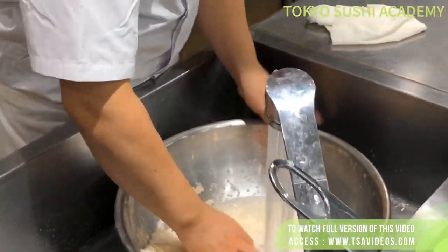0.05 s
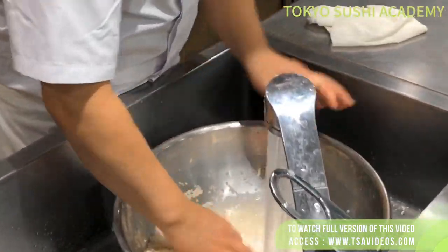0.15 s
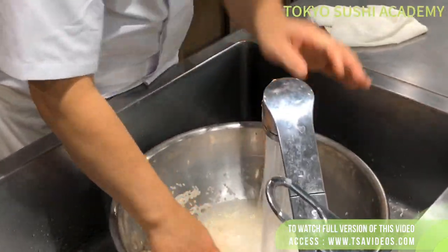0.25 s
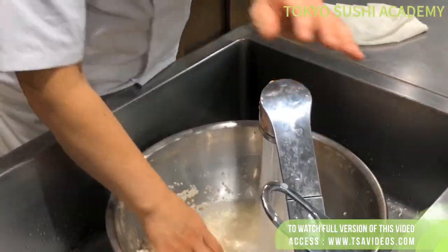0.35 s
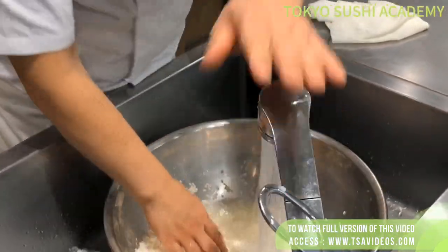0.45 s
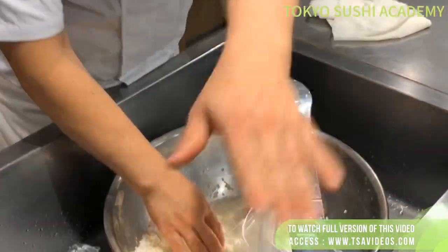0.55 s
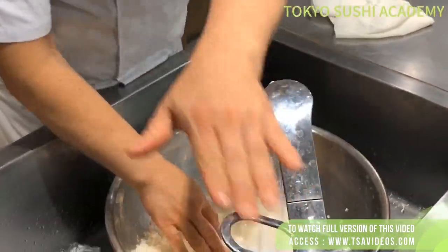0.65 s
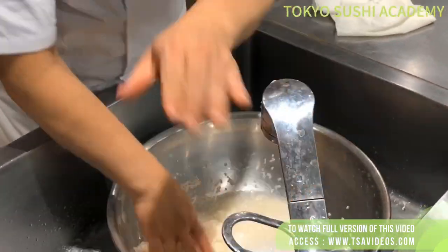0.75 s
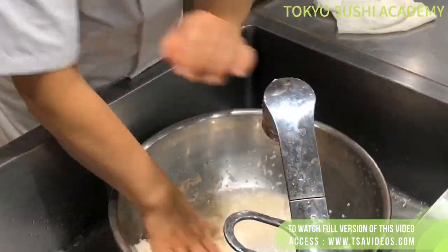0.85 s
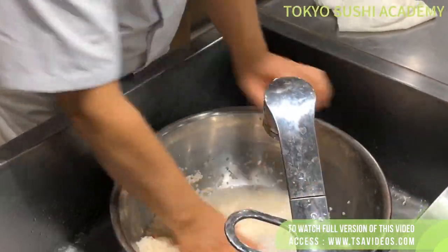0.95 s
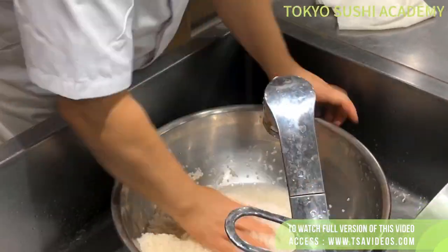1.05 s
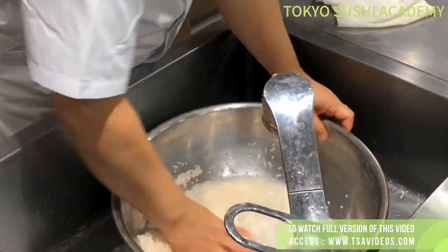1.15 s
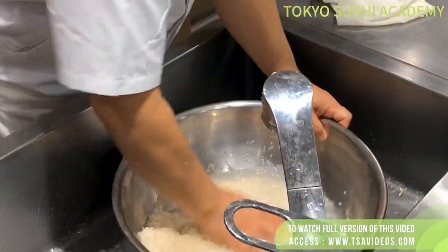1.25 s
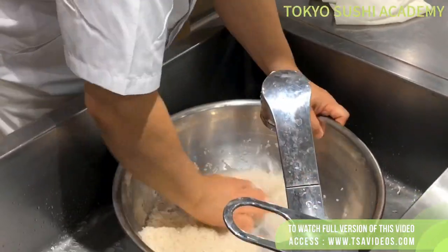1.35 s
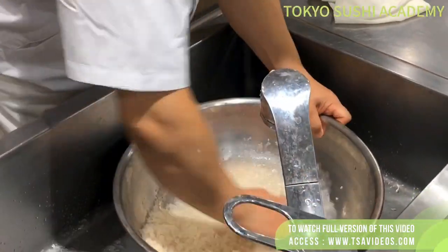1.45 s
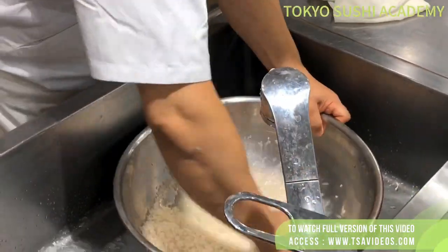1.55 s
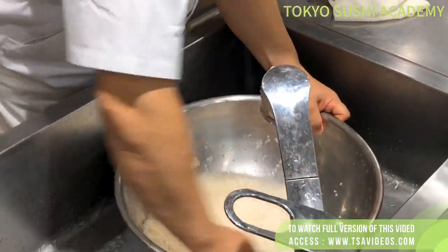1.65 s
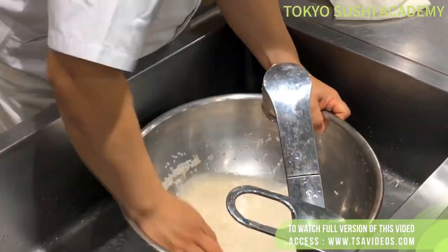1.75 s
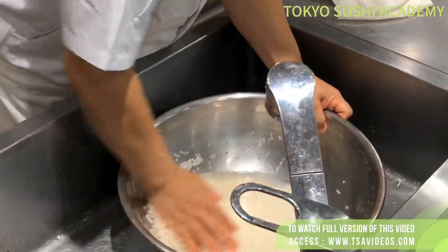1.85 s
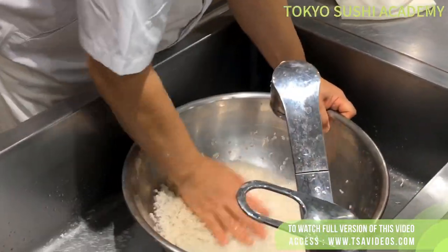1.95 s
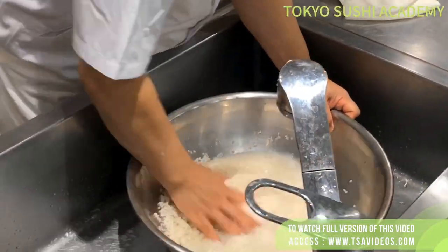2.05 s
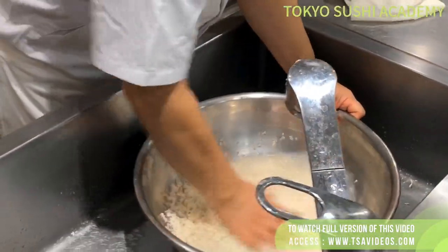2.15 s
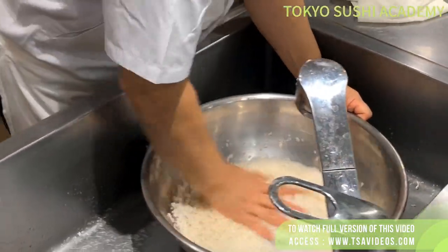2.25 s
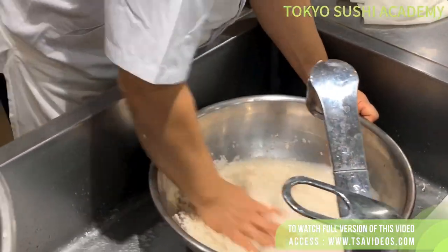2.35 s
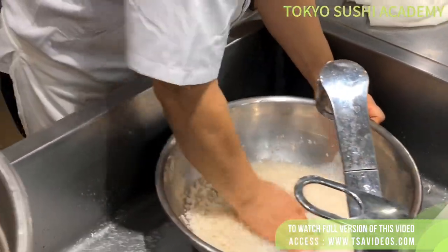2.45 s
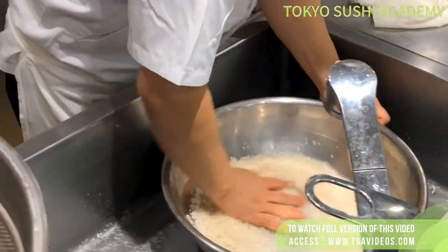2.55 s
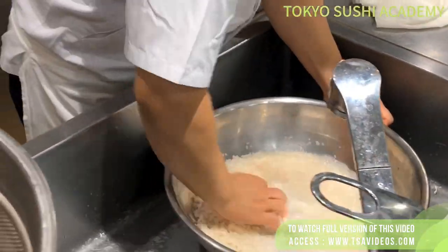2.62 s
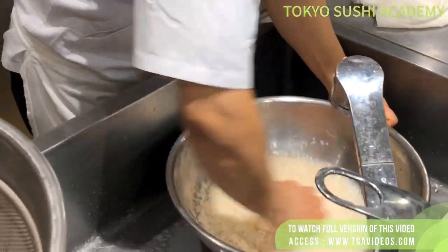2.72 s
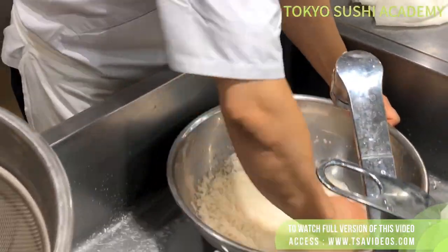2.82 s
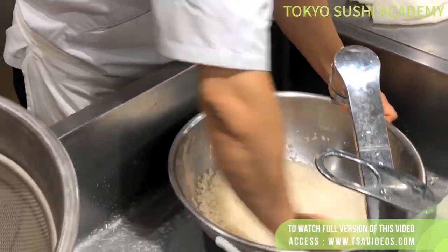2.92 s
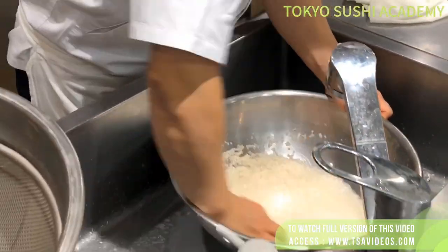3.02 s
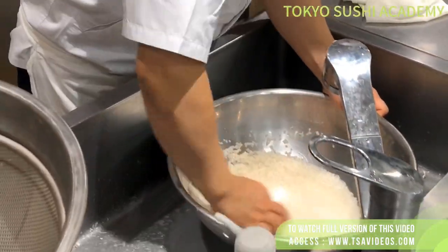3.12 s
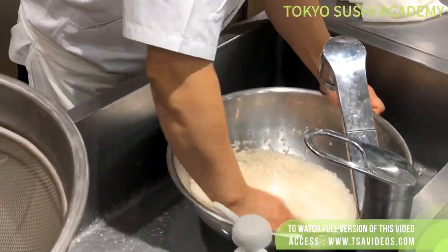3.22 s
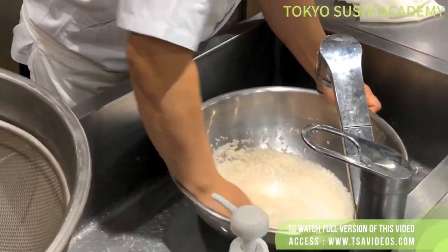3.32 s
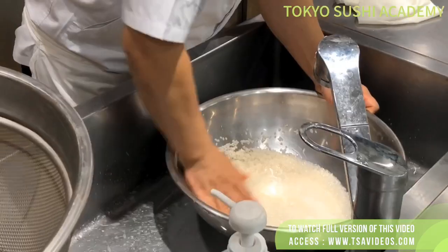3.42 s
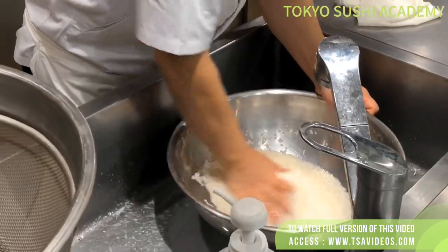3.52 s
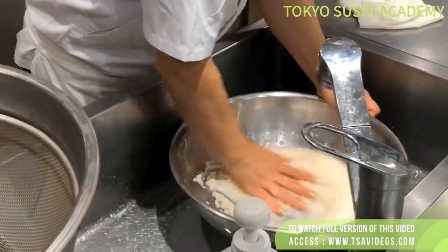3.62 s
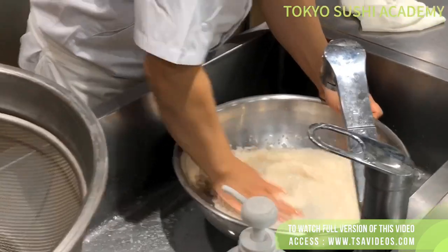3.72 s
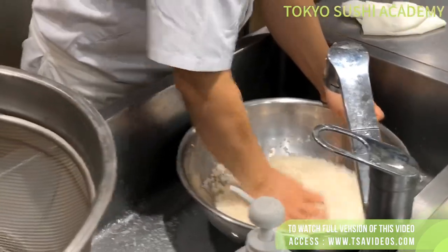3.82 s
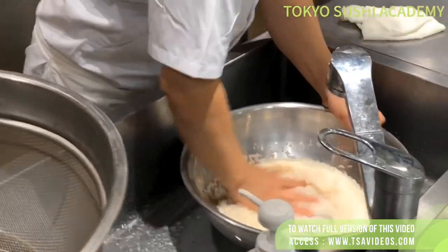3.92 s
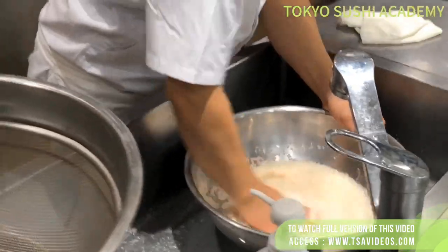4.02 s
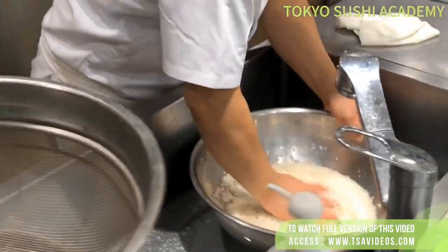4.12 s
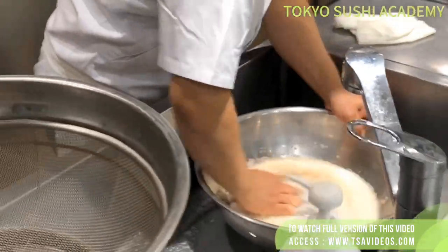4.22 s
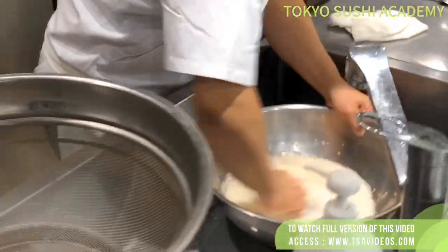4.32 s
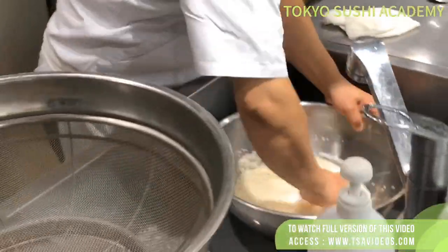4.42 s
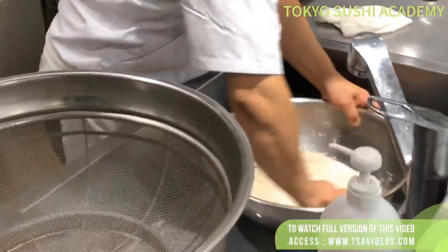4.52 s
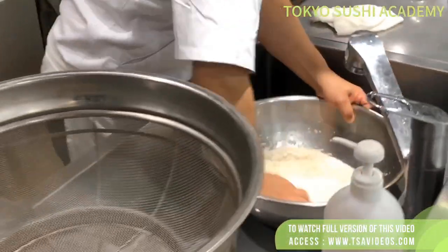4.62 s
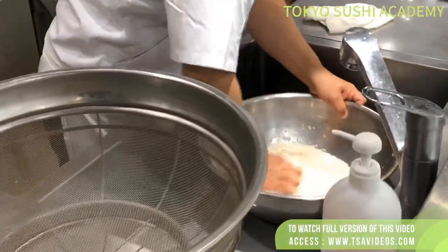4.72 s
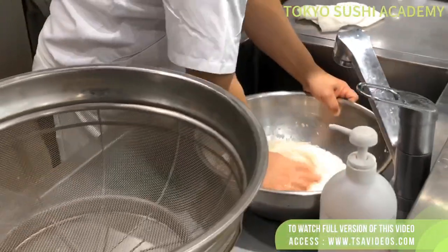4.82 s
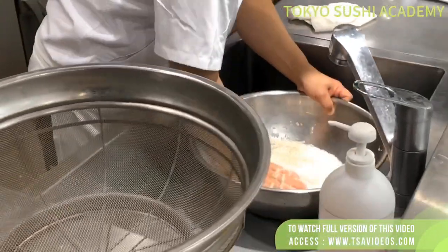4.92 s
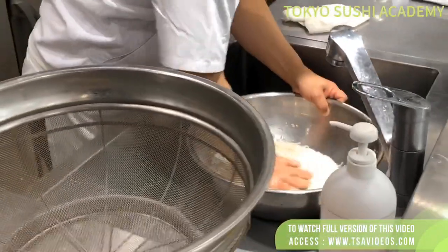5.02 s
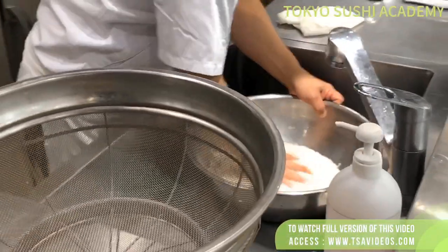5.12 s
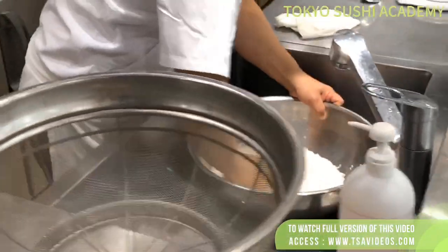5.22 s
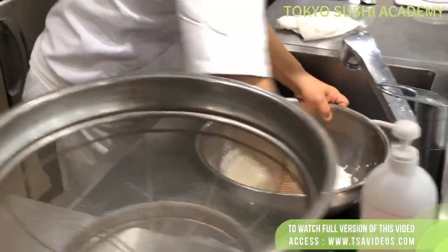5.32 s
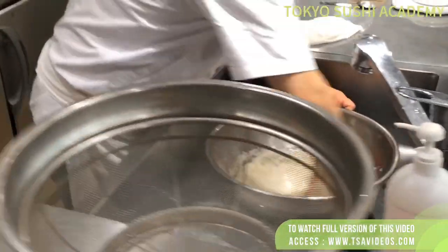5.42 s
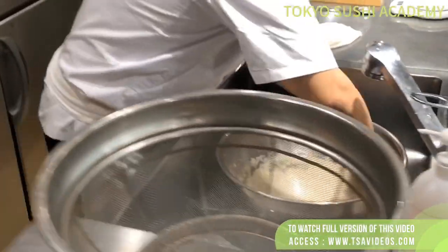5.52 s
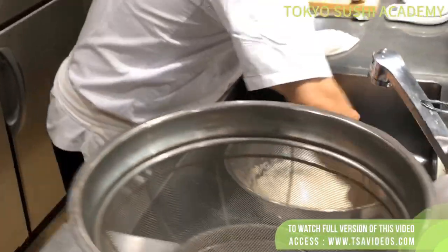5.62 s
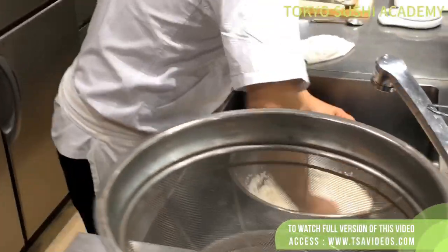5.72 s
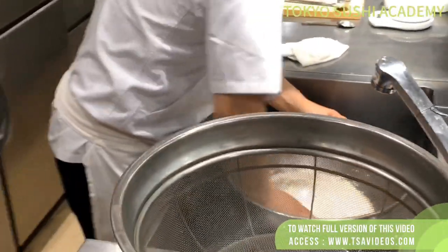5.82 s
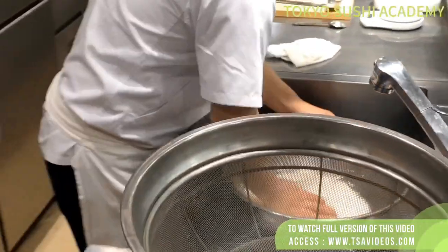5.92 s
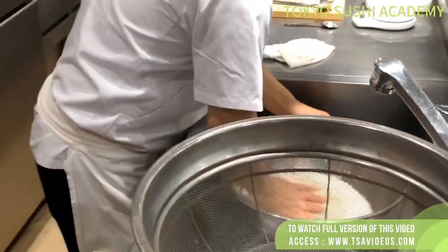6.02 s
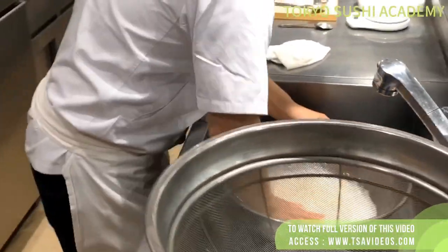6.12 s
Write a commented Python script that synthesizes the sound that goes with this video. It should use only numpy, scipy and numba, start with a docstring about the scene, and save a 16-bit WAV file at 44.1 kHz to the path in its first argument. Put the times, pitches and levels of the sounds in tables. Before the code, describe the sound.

Running water stops with a boom in the sink, and wet rice grains rattle and slosh as they are washed in a metal bowl.

```python
"""Washing rice in a steel bowl

A kitchen tap sprays and churns into the bowl and is slapped shut, which booms in the sink.
A hand then scrubs the wet grains in quick strokes: grains rattle and tick on the steel, water sloshes
and gurgles, air pockets plop and the bowl is knocked. One microphone; pauses fall nearly silent."""
import sys
import numpy as np
from scipy import signal
from scipy.fft import rfft, irfft, next_fast_len
from scipy.io import wavfile
from scipy.ndimage import uniform_filter1d
from numba import njit

SR = 44100
rng = np.random.default_rng(int(sys.argv[2]) if len(sys.argv) > 2 else 0)


def waveform_to_disk(signal):
    """Save audio, clipped to [-1, 1], as 16-bit WAV at the path in sys.argv[1]."""
    frames = np.transpose(np.atleast_2d(signal))
    scaled = np.clip(frames, -1, 1) * 32767
    samples = np.round(scaled).astype(np.int16)
    wavfile.write(sys.argv[1], SR, samples)


N = 271656


def amp(db):
    """Decibels to gain."""
    return 10 ** (np.asarray(db) / 20)


def unit(x):
    """Scale to rms 1."""
    return x / np.sqrt(np.mean(x ** 2) + 1e-20)


def filtered(x, response):
    """Apply a frequency response, a function of Hz."""
    size = next_fast_len(N + SR // 4)
    return irfft(rfft(x, size) * response(np.fft.rfftfreq(size, 1 / SR)), size)[:N]


def resonant_noise(modes):
    """Noise of rms 1 in resonances: centre_hz, width_hz, level_db."""
    response = lambda f: sum(amp(db) / (1 + ((f - hz) / width_hz) ** 2) for hz, width_hz, db in modes)
    return unit(filtered(rng.standard_normal(N), response))


def swells_db(rows, steepness=0.92):
    """Power sum of swells (top_s, level_db, rise_s, fall_s); each rises and falls 30 * steepness dB."""
    top_s, level_db, rise_s, fall_s = np.transpose(rows)[:, :, None]
    t = np.arange(0, N + 64, 64) / SR
    away = np.where(t < top_s, (top_s - t) / rise_s, (t - top_s) / fall_s)
    power = amp(2 * (level_db - 30 * steepness * away ** 1.73)).sum(axis=0)
    return np.interp(np.arange(N) / SR, t, 10 * np.log10(power + 1e-14))


@njit
def rings(start_s, hz, cycles, gain, glide, attack_cycles):
    """Damped sines, 60 dB down after `cycles`; pitch rises by the fraction `glide` per ten cycles."""
    out = np.zeros(N)
    for g in range(len(start_s)):
        start = int(start_s[g] * SR)
        for k in range(min(int(cycles[g] / hz[g] * SR), N - start)):
            turns = k / SR * hz[g]
            fade = np.exp(-np.log(1000) * turns / cycles[g]) * (1 - np.exp(-turns / attack_cycles)) ** 2
            out[start + k] += gain[g] * fade * np.sin(2 * np.pi * turns * (1 + glide * turns / 20))
    return out


def wet_texture(spectrum, per_s, cycles, spread_db, noise_db, patchy_db):
    """Short rising pings on patchy noise, both coloured by the spectrum; rms 1."""
    freq_hz, level_db = np.transpose(spectrum)
    when, pitch, size = rng.random((int(per_s * N / SR), 3)).T
    hz = freq_hz[1] * (freq_hz[-2] / freq_hz[1]) ** pitch
    gain = hz * amp(spread_db * size ** 2)  # most pings are small
    pings = rings(when * N / SR, hz, np.full(len(hz), cycles), gain, glide=.07, attack_cycles=1.)
    bins = signal.stft(rng.standard_normal(N), nperseg=256)[2]
    patches = uniform_filter1d(rng.standard_normal(bins.shape), size=3, axis=0)
    patches = unit(uniform_filter1d(patches, size=16, axis=1))
    noise = signal.istft(bins * amp(patchy_db * patches), nperseg=256)[1][:N]
    colour = lambda f: amp(np.interp(np.log(f + 1), np.log(freq_hz + 1), level_db, left=-120, right=-120))
    return unit(unit(filtered(pings, colour)) + amp(noise_db) * unit(filtered(noise, colour)))


def clumps(per_s, fall_s, depth_db):
    """Gain of rms 1 that jumps when a clump of grains lets go, then sinks."""
    releases = (rng.random(N) < per_s / SR) * rng.random(N)
    surge = np.minimum(signal.lfilter([1], [1, -np.exp(-1 / (fall_s * SR))], releases), .9)
    return unit(amp(depth_db * uniform_filter1d(surge, size=40)))


def tap(shut_s=.75):
    """Spray hisses, bubbles churn and the bowl hums and rings under the jet until the lever shuts."""
    # spray and bubble spectra: freq_hz, level_db
    spray_spectrum = [(1880, -20), (3200, -9.5), (4480, -9), (6410, 1.5), (7610, -1), (10900, -0.5),
                      (12700, -6), (14600, -6.5), (15500, -10)]
    churn_spectrum = [(330, -65), (560, -33), (600, -22.5), (877, -28), (964, -13.5), (1400, -5.5),
                      (1550, -2.5), (1860, -5.5), (2810, 0), (3090, -4), (4400, -10), (5720, -16.5),
                      (9680, -120)]
    # bowl resonances: centre_hz, width_hz, level_db
    hum_modes = [(387, 18, 1.5), (260, 37, -25)]
    ring_modes = [(1577, 45, 0)]
    t = np.arange(N) / SR
    shutoff_db = lambda drain_s: np.where(t < shut_s, 0, swells_db([(shut_s, 0, 1, drain_s)]))
    jet_db = shutoff_db(drain_s=.21)
    spray = wet_texture(spray_spectrum, per_s=2000, cycles=18, spread_db=19.5, noise_db=3.5, patchy_db=2.5)
    churn = wet_texture(churn_spectrum, per_s=300, cycles=38, spread_db=10, noise_db=7, patchy_db=2)
    churn_db = -31 + 13 * np.minimum(t, shut_s) + shutoff_db(drain_s=.23)  # louder as the bowl fills
    hum_gain = amp(-53 + jet_db) + amp(swells_db([(.2, -42, .17, .4), (.4, -40, .3, .15)]))
    ring_gain = amp(-46.5 + jet_db) + amp(swells_db([(.51, -30, .12, .13), (.79, -38, .15, .13)]))
    bowl = hum_gain * resonant_noise(hum_modes) + ring_gain * resonant_noise(ring_modes)
    return amp(-18 + jet_db) * spray + amp(churn_db) * churn + bowl


def slap():
    """The shut valve shakes the pipe: the sink booms and its plates clatter."""
    # sink and plate resonances: centre_hz, width_hz, level_db
    sink_modes = [(80.6, 11, -13.5), (126, 21, 2)]
    plate_modes = [(258, 300, 8), (343, 50, -20.5), (420, 45, 2.5), (540, 75, -6)]
    # their swells: top_s, level_db, rise_s, fall_s
    boom_swells = [(.722, -19, .018, 0.089), (.82, -33.5, 0.097, 0.17)]
    clatter_swells = [(.77, -26.5, .1, 0.15)]
    boom = amp(swells_db(boom_swells)) * resonant_noise(sink_modes)
    clatter = amp(swells_db(clatter_swells)) * resonant_noise(plate_modes)
    return boom + clatter


def strokes(max_fall_s=.36, lag_s=.0056):
    """With each swish grains rattle on each other; a little later water moves and the heap rubs the bowl."""
    # hand swishes: top_s, level_db, rise_s, fall_s, slosh_db, gurgle_db, rub_db (last three re level_db)
    swishes = [(1.04, -37, 0.099, 0.13, -4.5, -21.5, -33.5), (1.173, -31, 0.11, 0.21, -2.5, -21, -33.0),
               (1.27, -23.5, 0.088, 0.14, -7, -16.5, -33), (1.387, -23.0, 0.15, 0.23, -5, -15, -37.5),
               (1.507, -26, 0.08, 0.45, -7, -20, -37.5), (1.731, -25.5, 0.23, 0.16, -8.5, -23, -42),
               (1.854, -28.0, 0.21, 0.15, -6.5, -16, -39), (2.005, -42, 0.093, 0.095, -4, -18, -31),
               (2.222, -28, 0.12, 0.3, -2.5, -21, -34.5), (2.363, -27.0, 0.33, 0.14, -7, -22.5, -33.5),
               (2.499, -27, 0.15, 0.41, -8, -23.5, -29.5), (2.6, -30, 0.053, 0.134, -6, -51, -30),
               (2.68, -28.5, 0.075, 0.098, -5, -16.5, -35), (2.876, -36.0, 0.11, 0.12, -10, -35, -36),
               (2.993, -26.0, 0.05, 0.12, -10, -23.5, -41), (3.165, -23, 0.23, 0.15, -13, -25.5, -39.0),
               (3.378, -33, 0.028, 0.084, -13.5, -16.5, -36), (3.523, -24.5, 0.041, 0.069, -6.5, -8, -38.0),
               (3.615, -33.5, 0.14, 0.079, -4, -4, -30), (3.785, -28.5, 0.053, 0.16, -7, -14, -23.5),
               (3.953, -26.5, 0.196, 0.36, -9, -18, -30.5), (4.157, -25, 0.11, 0.27, -9, -17.5, -31),
               (4.305, -30, 0.17, 0.095, -6.5, -21, -27), (4.512, -31, 0.069, 0.13, -8.5, -27.5, -31),
               (4.64, -31.5, 0.11, 0.5, -20, -33, -40), (4.77, -25.5, 0.11, 0.33, -10, -23.5, -41),
               (4.99, -39.5, 0.11, 0.1, -8.5, -26, -31), (5.119, -45.5, 0.087, 0.12, -14, -26, -41),
               (5.3, -30, 0.087, 0.094, -11, -14.5, -41), (5.434, -63.5, 0.083, 0.11, -2.5, -46, -54),
               (5.579, -28.5, 0.033, 0.12, -31.5, -41, -31.5), (5.738, -24, 0.12, 0.2, -16.5, -37.5, -34),
               (5.918, -28.0, 0.11, 0.12, -11.5, -13.5, -38.5), (6.161, -57, 0.046, 0.049, -11, -27, -54.0)]
    # grain, water and steel spectra: freq_hz, level_db
    rattle_spectrum = [(3700, -39), (4000, -6), (5000, -3), (6340, 1), (7400, -2.5), (10800, -3.5),
                       (12100, -6.5), (12400, -42)]
    sparkle_spectrum = [(12100, -57), (12400, -7.5), (13300, 3), (14500, -5.5), (15800, -0.5)]
    slosh_spectrum = [(1700, -50), (1900, -1), (2200, 1), (2740, 3), (3700, -1), (4000, 0), (4400, -38.5)]
    gurgle_spectrum = [(880, -16.5), (1000, -12.5), (1200, -4), (1550, -1.5), (1850, -1.5), (2000, -22.5)]
    rub_spectrum = [(190, -42.5), (250, -4.5), (330, -8.5), (390, -0.5), (450, -4.5), (690, -11.5),
                    (760, 0.5), (830, -10), (950, -40.5)]
    # low rumble: centre_hz, width_hz, level_db
    rumble_modes = [(45, 35, -5.5), (144, 54, 2.5)]
    top_s, level_db, rise_s, fall_s, slosh_db, gurgle_db, rub_db = np.transpose(swishes)
    fall_s = np.minimum(fall_s, max_fall_s)

    def layer_db(offset_db, delay_s, steepness=1):
        return swells_db(np.transpose([top_s + delay_s, level_db + offset_db, rise_s, fall_s]), steepness)

    rattle_db = layer_db(0, 0)
    drive_db = rattle_db + 30
    rattle = wet_texture(rattle_spectrum, per_s=2500, cycles=6,
                         spread_db=14.5, noise_db=5.5, patchy_db=3.5)
    sparkle = wet_texture(sparkle_spectrum, per_s=1000, cycles=16,
                          spread_db=3.5, noise_db=2.5, patchy_db=0)
    grains = amp(rattle_db) * rattle + amp(-47 + 1.4 * drive_db) * sparkle
    grains *= clumps(per_s=35, fall_s=.012, depth_db=6.5)
    # water swells and fades faster than the grains
    slosh = amp(layer_db(slosh_db, lag_s, steepness=1.18)) * clumps(per_s=20, fall_s=.02, depth_db=7)
    slosh *= wet_texture(slosh_spectrum, per_s=400, cycles=34, spread_db=15, noise_db=9, patchy_db=1.9)
    gurgle = amp(layer_db(gurgle_db, lag_s, steepness=1.15))
    gurgle *= wet_texture(gurgle_spectrum, per_s=150, cycles=29, spread_db=1.5, noise_db=15, patchy_db=6)
    rub = amp(layer_db(rub_db, lag_s)) + amp(-84)  # floor: faint steady low room noise between strokes
    rub *= wet_texture(rub_spectrum, per_s=30, cycles=22, spread_db=6, noise_db=7, patchy_db=6)
    rumble = amp(-73 + .53 * drive_db) * resonant_noise(rumble_modes)
    return grains + slosh + gurgle + rub + rumble


def knocks(centre_t60_s=.13, attack_s=.0067):
    """A soft push rings the bowl's modes near its centre frequency; high modes die first."""
    # hand against the bowl: start_s, level_db, centre_hz, loss_db (one octave off centre)
    pushes = [(1.148, -57, 390, 57), (1.233, -51, 700, 9.5), (1.450, -48.5, 388, 83), (2.180, -57, 390, 62),
              (2.208, -43, 333, 60), (2.239, -40, 336, 62), (2.31, -53, 385, 60), (2.37, -51, 385, 60),
              (2.517, -28.5, 640, 75), (2.520, -33, 374, 78), (2.547, -33, 410, 46), (2.663, -42, 397, 65),
              (3.028, -46.5, 476, 78), (3.077, -44, 490, 86), (3.784, -46.5, 255, 39), (3.966, -42, 65, 25),
              (4.164, -26, 516, 13.5), (4.204, -40, 266, 15), (4.756, -52, 244, 57),
              (4.78, -47.5, 242, 61.5), (4.889, -50, 245, 14), (4.911, -48, 250, 40),
              (5.572, -48.5, 375, 29.5), (5.70, -58, 65, 25), (5.928, -58, 65, 24), (5.975, -63, 65, 25)]
    # bowl modes: pitch_hz, level_db
    bowl_modes = [(65, 5), (245, 5), (300, -0.5), (385, 6.5), (480, -2), (555, -1), (638, 6.5)]
    hz, mode_db = np.transpose(bowl_modes)
    out, t = np.zeros(N + SR), np.arange(SR // 2) / SR
    for start_s, level_db, centre_hz, loss_db in pushes:
        push_db = level_db - loss_db * np.log2(hz / centre_hz) ** 2
        gain = amp(push_db + mode_db + rng.normal(0, .83, len(hz)))
        drift_rad = np.cumsum(rng.normal(0, .021, (len(hz), len(t))), axis=1)  # water roughens the ring
        fade = amp(-60 * t / centre_t60_s * (hz[:, None] / centre_hz) ** .26)
        ring = gain @ (fade * np.sin(2 * np.pi * hz[:, None] * t + drift_rad))
        out[round(start_s * SR):][:len(t)] += ring * (1 - np.exp(-t / attack_s)) ** 2
    return out[:N]


def plops(low_cut_hz=850):
    """Each air pocket snaps as its skin tears, rings briefly and sheds two fainter, lower-pitched neighbours."""
    # air pockets: start_s, level_db, pitch_hz
    pockets = [(1.243, -34.5, 1220), (1.389, -18.5, 1397), (1.400, -25, 1325), (1.459, -18, 2120),
               (1.505, -16.5, 2000), (1.552, -16, 2260), (1.595, -18, 2670), (1.627, -11.5, 3160),
               (1.709, -30, 1960), (1.769, -34, 1175), (1.894, -35, 1340), (2.257, -16.5, 2580),
               (2.467, -22, 1454), (2.522, -26, 2750), (2.544, -26.5, 2200), (2.674, -13, 3020),
               (2.974, -10, 4500), (3.003, -23, 1164), (3.083, -14, 3370), (3.171, -13.5, 3700),
               (3.390, -40, 1350), (3.519, -11.5, 2420), (3.946, -15.5, 2260), (4.189, -19, 2230),
               (4.500, -25.5, 2730), (4.510, -22, 2800), (5.762, -15.5, 3340), (5.956, -28, 1720)]
    start_s, level_db, hz = np.transpose(pockets)
    cycles = 76.4 * (1280 / hz)  # higher pockets die in fewer cycles
    parts = [(0, .96, 2.5), (.001, .86, -7), (.003, .76, -12.5)]
    bubbles = sum(rings(start_s + delay_s, ratio * hz, cycles, amp(level_db + offset_db),
                        glide=.01, attack_cycles=1.2) for delay_s, ratio, offset_db in parts)
    snap_cycles = np.full(len(hz), 7.7)
    snaps = rings(start_s, 4.5 * hz, snap_cycles, amp(level_db - 6), glide=0., attack_cycles=.3)
    return filtered(bubbles + snaps, lambda f: 1 / (1 + (low_cut_hz / (f + 1)) ** 12))


def ticks(low_cut_hz=3700):
    """A flung grain hits the steel: a sharp contact and two lighter rebounds at other pitches."""
    # grain impacts: start_s, level_db, pitch_hz
    impacts = [(1.2564, -11, 8600), (1.629, -12.5, 6920), (1.718, -9, 6540), (1.821, -12.5, 5440),
               (2.1605, -33, 6300), (2.5928, -13, 6350), (2.7178, -16.5, 6040), (2.971, -16, 4430),
               (3.0841, -13, 6160), (3.123, -17, 6640), (3.37, -19, 5150), (3.5118, -10, 10060),
               (3.7534, -33, 10800), (4.002, -16, 8500), (4.5856, -18.5, 6500), (5.563, -22, 8070),
               (5.573, -17, 8850), (5.6, -13.5, 5250)]
    start_s, level_db, hz = np.transpose(impacts)
    cycles = np.full(len(hz), 36.)
    bounces = [(0, 1.005, 3), (.0012, 1.18, 1), (.0035, .9, -.5)]
    contacts = sum(rings(start_s + delay_s, ratio * hz, cycles, amp(level_db + offset_db),
                         glide=0., attack_cycles=1.) for delay_s, ratio, offset_db in bounces)
    return filtered(contacts, lambda f: 1 / (1 + (low_cut_hz / (f + 1)) ** 12))


def scene():
    """All sources reach one microphone."""
    mono = tap() + slap() + strokes() + knocks() + plops() + ticks()
    return np.array([mono, mono])


def record(dry):
    """A noise suppressor lowers quiet moments, peaks are rounded, deep bass and top treble are cut."""
    threshold_db, db_per_db, reaction_s = -34.5, .17, .056
    ceiling, low_cut_hz, top_hz = .55, 45, 15780
    span = round(reaction_s * SR)
    level_db = 10 * np.log10(np.abs(uniform_filter1d(dry ** 2, size=span)) + 1e-12)
    gate_db = db_per_db * np.minimum(level_db - threshold_db, 0)
    gated = dry * amp(uniform_filter1d(gate_db, size=span))
    rounded = gated / (1 + np.abs(gated / ceiling) ** 4) ** (1 / 4)
    band = lambda f: 1j * f / (low_cut_hz + 1j * f) * np.clip((top_hz - f) / 150, 0, 1)
    return np.array([filtered(channel, band) for channel in rounded])


dry = scene()
out = record(dry)
waveform_to_disk(out)
```